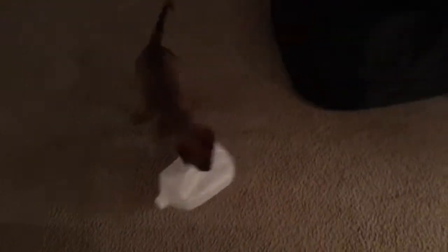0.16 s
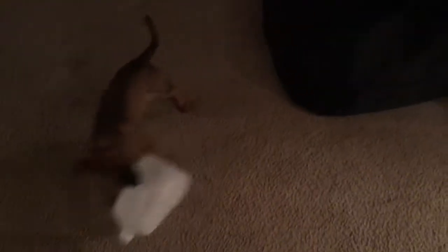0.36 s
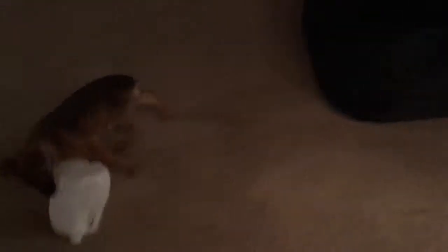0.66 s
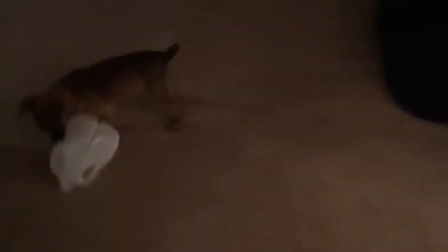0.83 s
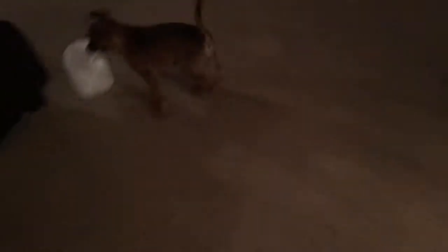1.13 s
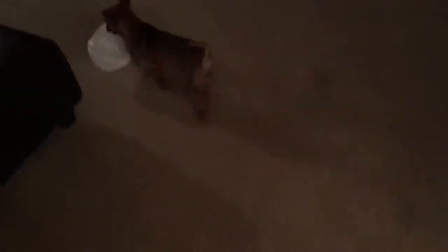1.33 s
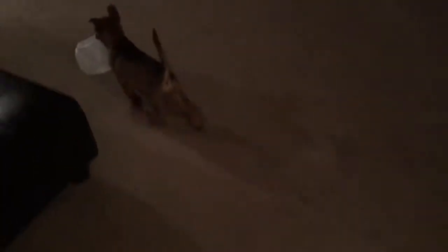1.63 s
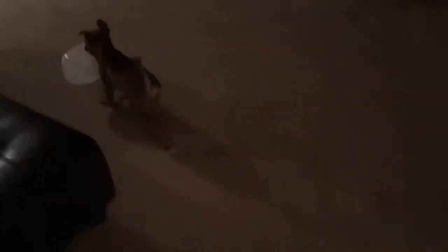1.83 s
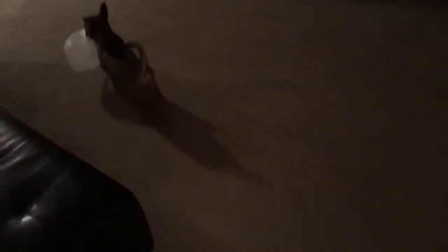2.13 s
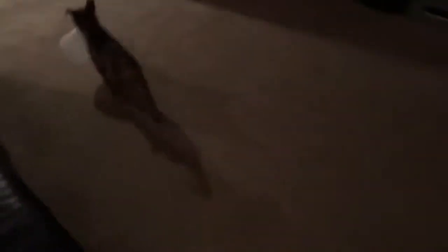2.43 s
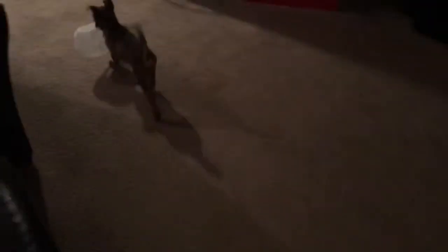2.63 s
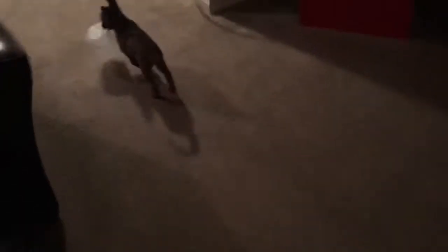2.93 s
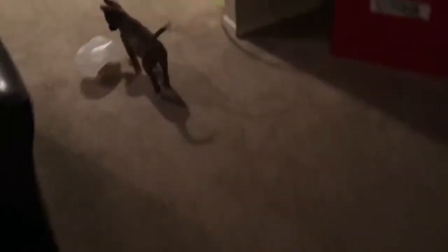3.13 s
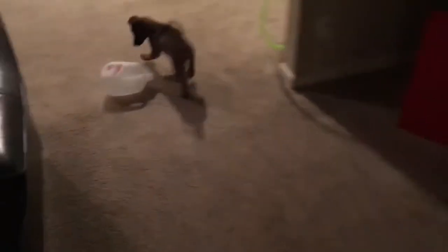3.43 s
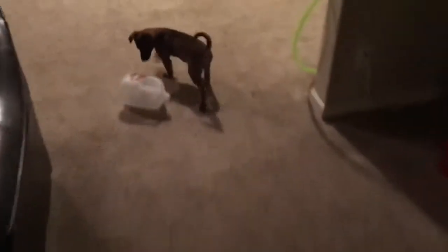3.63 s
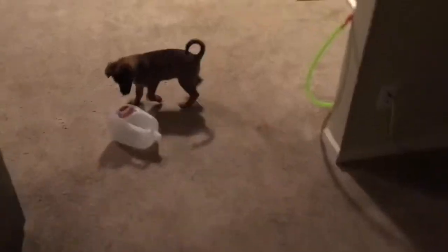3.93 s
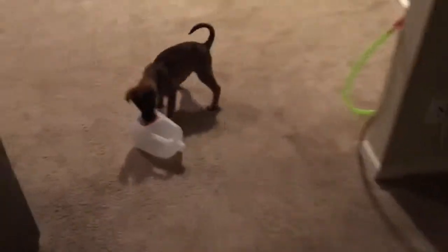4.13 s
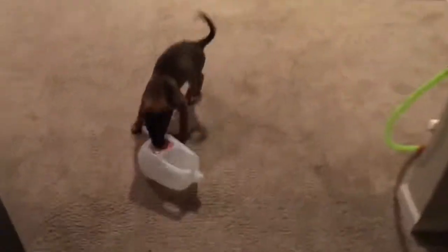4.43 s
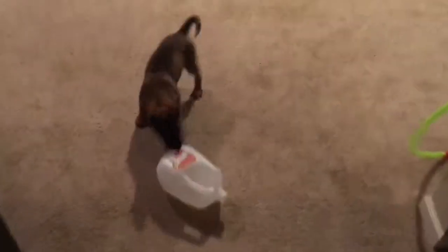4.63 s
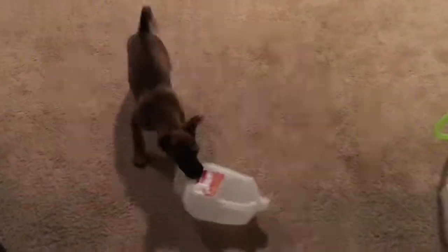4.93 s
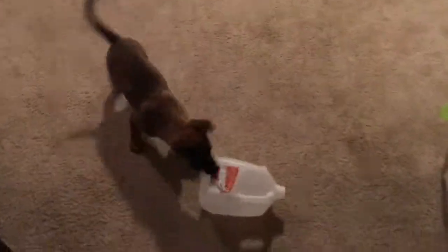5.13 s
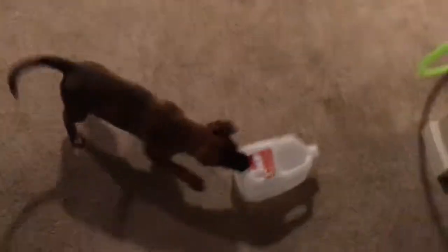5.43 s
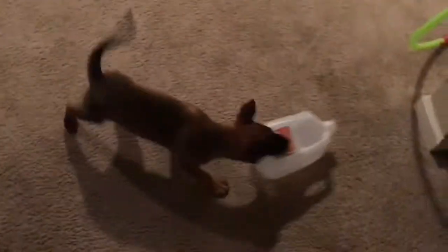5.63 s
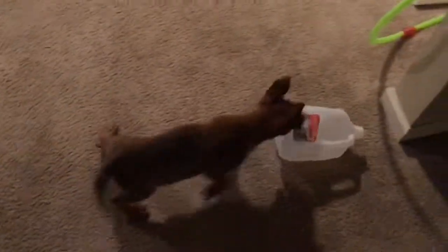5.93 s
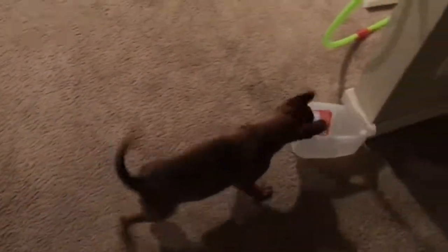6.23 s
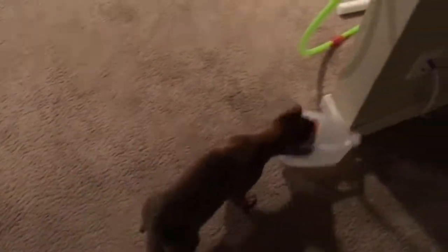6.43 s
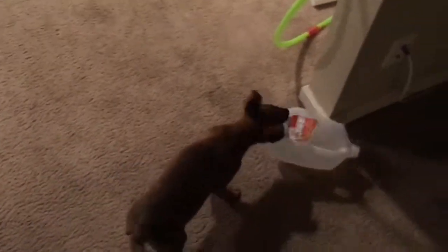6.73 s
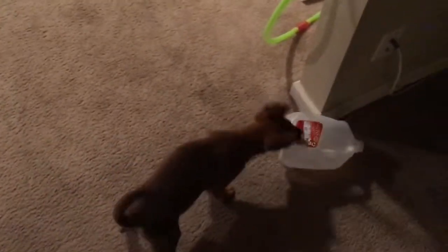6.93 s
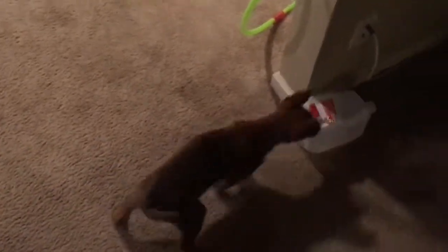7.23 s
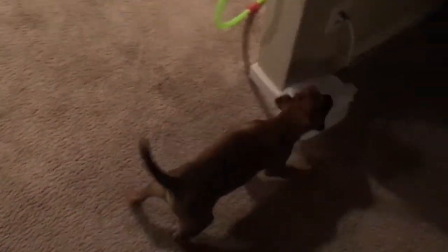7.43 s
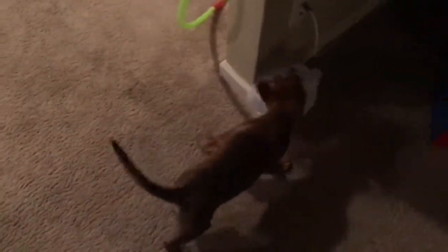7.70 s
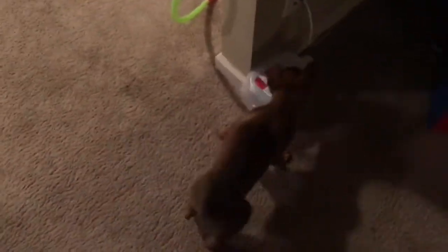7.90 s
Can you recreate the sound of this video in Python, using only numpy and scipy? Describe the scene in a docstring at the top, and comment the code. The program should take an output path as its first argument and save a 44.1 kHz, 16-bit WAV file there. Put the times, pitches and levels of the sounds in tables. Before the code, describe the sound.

A quiet, small carpeted room with soft air noise and a faint low hum that grows slightly after 3 s. From 0 to 1.3 s an empty plastic jug drags, rustles and taps softly in a puppy's mouth. Isolated hollow bonks follow at 1.8 and 2.6 s, with a looser double knock at 3.0-3.1 s as it drops, all somewhat distant and roomy. Almost nothing until 4.2 s, when a near, boomy knock and drumming scrape begin. From 4.4 to 5.8 s bites and shoves thicken into quick clacks, crinkles, rasping tooth skids and popping dents. At 6.05 s blows harden; at 6.2 s comes the loudest, a sharp crack with hollow boom and low wall thud. Another boomy knock at 6.5 s, scraping, then clusters at 7.1, 7.45, 7.6 and 7.85 s, with a faint high hissing rub near 7.6-7.9 s.

```python
"""An empty plastic jug booms and clacks as a puppy carries it over a carpet, drops it, then bites and
shoves it against a wall corner. Blows excite decaying modes of the thin walls; dents pop and ring.
Between blows, stick-slip impulses of teeth and carpet pile drum the panels, rasp and hiss.
The wall, the floor and the air in the jug add low modes. Decaying noise makes the small furnished room;
two sines and shaped noise make a faint appliance hum and still air."""
import sys
import numpy as np
from scipy import signal
from scipy.fft import rfft, irfft, next_fast_len
from scipy.io import wavfile
from scipy.ndimage import uniform_filter1d, map_coordinates

SR = 44100
rng = np.random.default_rng(int(sys.argv[2]) if len(sys.argv) > 2 else 0)


def put_to_file(sound):
    """Save the sound as 16-bit audio at rate SR, in the file named by the first command-line argument."""
    columns = np.atleast_2d(sound).T  # one column per channel
    safe = np.clip(columns, -1, 1)
    whole_steps = np.round(safe * 32767)
    wavfile.write(sys.argv[1], SR, whole_steps.astype(np.int16))


N = 355442
TIME = np.arange(N) / SR

# modes of the jug, air and whole panels first, then the stiff corners: mode_hz, relative_db, t60_s
JUG_MODES = [(154, -12, 0.15), (177.3, -10.5, 0.2), (224, 4, 0.062), (275.4, -8, 0.14), (308.3, 7, 0.11),
             (368.8, 7.5, 0.075), (422.5, -5.5, 0.067), (488.8, -8, 0.18), (563, -7, 0.039),
             (674, -21, 0.026), (918, 5, 0.068), (1010, 6.5, 0.068), (1174, 7.5, 0.05), (1340, 6, 0.057),
             (1463, 3.5, 0.12), (1629, 5, 0.1), (1980, 1.5, 0.045), (2240, 4, 0.032), (2460, -14, 0.035),
             (3260, 3.5, 0.034), (3780, -1.5, 0.025), (4090, 0, 0.072), (5500, 3.5, 0.021)]
PANEL_TOP_HZ = 760  # modes below belong to air and panels, modes above to the corners
# spectrum of the crackling corners: frequency_hz, relative_db
CLACK_SPECTRUM = [(250, -1.5), (550, 7), (900, -5.5), (1500, -6.5), (2300, -6), (2900, -10.5), (3600, -6.5),
                  (5000, -28.5), (8000, -72)]
# spectrum of the ticking skin and of the hissing pile: frequency_hz, relative_db
TICK_SPECTRUM = [(1500, 5), (3500, 0), (5500, -1.5), (7500, -3.5), (10500, -8.5), (15500, -15)]
# share of room in a blow, highest while the puppy is far away: time_s, room_db
ROOM_SHARE = [(0.5, -4), (1.8, -2), (3.1, -4), (4.5, -8), (8, -9.5)]


def amp(db):
    """Level to amplitude: 20 dB is a factor of ten."""
    return 10 ** (np.asarray(db) / 20)


def unit(x):
    """Normalise the mean power: scale to rms 1."""
    return x / np.sqrt(np.mean(x ** 2) + 1e-20)


def unit_attack(x):
    """Normalise the peak short-time power: the loudest hundredth of a second gets rms 1."""
    return x / np.sqrt(uniform_filter1d(x ** 2, SR // 100).max() + 1e-20)


def along(points, hz):
    """Interpolate (Hz, value) points on a logarithmic frequency axis."""
    f, v = np.transpose(points)
    return np.interp(np.log(hz + 1), np.log(f + 1), v)


def wobble(rate):
    """Slow random modulation: a smooth curve through random knots, rate knots per second."""
    return map_coordinates(rng.standard_normal(int(N * rate / SR) + 4), [TIME * rate])


def filtered(x, response):
    """Linear filtering: multiply the spectrum of x by a response of frequency."""
    m = next_fast_len(len(x) + SR // 4)
    return irfft(rfft(x, m) * response(np.fft.rfftfreq(m, 1 / SR)), m)[:len(x)]


def coloured(x, spectrum):
    """Spectral shaping: lay a spectrum on x and scale to rms 1."""
    return unit(filtered(x, lambda hz: amp(along(spectrum, hz))))


def add(track, s, sound):
    """Superposition: mix a sound into the track at s seconds."""
    part = track[max(round(s * SR), 0):][:len(sound)]
    part += sound[:len(part)]


def room(x, wet_db):
    """Reverberation: add x convolved with fresh noise that decays at its own rate in each band."""
    # decay time of the furnished room: frequency_hz, t60_s
    room_decay = [(100, 0.58), (290, 0.46), (560, 0.2), (800, 0.3), (1840, 0.23), (4850, 0.19),
                  (14000, 0.18)]
    hz, t, z = signal.stft(rng.standard_normal(SR // 2), SR, nperseg=256)
    tail = signal.istft(z * amp(-60 * t / along(room_decay, hz)[:, None]), SR, nperseg=256)[1]
    tail = np.pad(tail / np.linalg.norm(tail), (SR // 200, 0))  # the answer starts 5 ms late
    return x + amp(wet_db) * signal.fftconvolve(x, tail)[:len(x)]


def blow(pitch_hz, clack_hz, crush, boom_db, clack_db, tick_db):
    """Modal impact: a panel flexes and booms, the corners clack, the skin ticks."""
    # spectrum of the slap on the panel: frequency_hz, relative_db
    slap_spectrum = [(35, -28), (70, 5), (150, 21), (350, 21.5), (560, 0), (800, -24), (1150, -9),
                     (2000, -20), (4000, -66)]
    t = np.arange(SR // 3) / SR
    hz, db, t60 = np.transpose(JUG_MODES)
    hz = hz * (1 + 0.019 * rng.standard_normal(len(hz)))  # the grip bends the walls
    size = amp(db + 2 * rng.standard_normal(len(hz)))
    modes = size[:, None] * np.sin(2 * np.pi * hz[:, None] * t) * amp(-60 * t / t60[:, None])
    low = hz < PANEL_TOP_HZ

    def near(f, centre_hz, slope_db):
        """Local excitation: the struck spot feeds its own modes most; slope in dB per octave."""
        return amp(-slope_db * np.abs(np.log2((f + 1) / centre_hz)))

    def burst(spectrum, decay):
        """Broadband transient: shaped noise that falls 60 dB in decay seconds."""
        return coloured(rng.standard_normal(len(t)), spectrum) * amp(-60 * t / decay)

    crush = np.clip(crush, .0004, .02)  # s
    give = 1 - np.exp(-t / crush)  # a soft contact starts slowly and crackles longer

    panel = np.sin(2 * np.pi * pitch_hz * t) * amp(-60 * t / 0.066)
    panel_modes = (near(hz, pitch_hz, slope_db=3.5) * low) @ modes
    flex = unit_attack(panel_modes) + 1.13 * unit_attack(panel)
    slap = unit_attack(burst(slap_spectrum, decay=0.061))
    boom = (flex * (1 - np.exp(-t / 0.0029)) + 0.28 * slap) * give

    buckling = (rng.standard_normal(len(t)) * give * np.exp(-t / crush))[:SR // 10]
    # a small patch snaps in and is damped at once
    dent = np.sin(2 * np.pi * clack_hz * t) * amp(-60 * t / .012)
    corner_modes = (near(hz, clack_hz, slope_db=11.0) * ~low) @ modes
    ring = unit_attack(corner_modes) + 1.02 * unit_attack(dent)
    crackle = burst(CLACK_SPECTRUM, decay=0.044 + 9 * crush)
    crackle = filtered(crackle, lambda f: near(f, clack_hz, slope_db=3.0)) * give
    buckled_ring = signal.fftconvolve(ring, buckling)[:len(t)]
    clack = unit_attack(buckled_ring) + 0.7 * unit_attack(crackle)

    tick = burst(TICK_SPECTRUM, decay=0.034 + 8 * crush) * give
    # a hard tooth opens with a snap
    tick = tick + 2 * burst(TICK_SPECTRUM, decay=0.0067) * np.exp(-crush / 0.0019)

    levels = amp([boom_db, clack_db, tick_db])
    return levels @ [unit_attack(part) for part in (boom, clack, tick)]


def knocks():
    """Impact series: every blow is a separate modal impact with its own reverberation."""
    # blows on the jug, with the pitches of the struck panel and of the clack; blow() limits crush_s:
    # start_s, pitch_hz, clack_hz, crush_s, boom_db, clack_db, tick_db
    blows = [(0.442, 425, 664, 0.011, -39.5, -49, -57.5), (0.634, 446, 1600, 0.0004, -43.5, -50, -61),
             (0.982, 357, 980, 0.0027, -54, -51, -65), (1.008, 255, 1700, 0.004, -54, -57, -77),
             (1.3, 338, 900, .004, -58, -70, -80), (1.803, 295, 1060, 0.00041, -27.5, -57, -77),
             (1.824, 438, 810, 0.001, -37, -62, -76), (2.177, 293, 960, 0.0012, -48, -53.5, -63.5),
             (2.57, 225, 912, 0.0063, -49.5, -57.5, -67), (2.624, 246, 1300, 0.0012, -27, -57, -64),
             (2.655, 295, 900, 0.003, -42.5, -70, -79), (3.033, 250, 2150, 0.0019, -38, -51, -57),
             (3.039, 270, 970, 0.002, -39, -42, -69), (3.046, 403, 1550, 0.002, -48, -49, -65),
             (3.118, 307, 700, 0.002, -35.5, -60, -73), (3.146, 306, 700, 0.0023, -38, -65, -78),
             (3.48, 300, 1000, .003, -61, -66, -76), (3.75, 330, 1300, .003, -61, -67, -77),
             (4.201, 252, 2200, 0.001, -39.5, -62, -55), (4.227, 245.6, 2100, 0.00095, -27.5, -47.5, -45.5),
             (4.487, 386, 805, 0.0019, -30.5, -55, -73), (4.597, 336, 1500, 0.0012, -48, -45, -54),
             (4.619, 340, 2530, 0.00091, -36, -39.5, -51), (4.628, 335, 1300, 0.00082, -41, -42, -47),
             (4.655, 351, 1210, 0.0021, -42, -50, -52), (4.824, 299, 1470, 0.00023, -34, -48, -46.5),
             (4.845, 294, 1530, 0.00023, -40, -34, -39.5), (4.859, 322, 1200, .0007, -39, -52, -72),
             (4.935, 292, 1340, 0.011, -38.5, -43, -46), (4.975, 323, 1190, 0.0062, -39, -43.5, -63),
             (5.107, 360, 1250, 0.0011, -31, -42.5, -54), (5.118, 332, 1580, 0.0028, -38, -40.5, -49),
             (5.138, 327, 2730, 0.0017, -41, -41.5, -53), (5.26, 374, 2220, 0.0032, -58, -34, -38.5),
             (5.271, 348, 2290, 0.00066, -27.5, -35, -49), (5.289, 332, 1670, 0.0012, -24.5, -41, -44),
             (5.328, 298, 1200, .0006, -39, -57, -62), (5.385, 296, 2190, 0.0023, -34, -41, -58),
             (5.411, 378, 850, 0.0011, -38.5, -37, -43), (5.436, 322, 1400, 0.0025, -40, -42, -49),
             (5.526, 313, 980, 0.0006, -39, -41, -52), (5.536, 298, 1210, 0.0017, -29.5, -33.5, -42.5),
             (5.557, 290, 1720, 0.0019, -39, -38, -53), (5.672, 259, 1580, 0.0016, -27.5, -37, -41),
             (5.686, 299, 1680, 0.0003, -24, -29.5, -48), (5.692, 270, 900, 0.00077, -26, -40, -52),
             (5.78, 330, 1190, 0.0003, -49, -29.5, -42), (5.794, 360, 3220, 0.0004, -41, -34.5, -34.5),
             (6.047, 304, 980, 0.00035, -27.5, -27, -36.5), (6.085, 285, 1020, 0.0003, -20.5, -30.5, -47),
             (6.18, 393, 1140, 0.0013, -55, -37, -32), (6.191, 270, 1430, 0.00076, -17, -18, -27.5),
             (6.195, 394, 2030, 0.00076, -21, -21, -36), (6.2, 202, 2060, 0.0005, -19.5, -23.5, -27),
             (6.219, 403, 1252, 0.00053, -28, -36, -50), (6.315, 282, 1180, 0.0011, -32, -39, -62),
             (6.342, 297, 1200, 0.0012, -24.5, -54, -62), (6.491, 360, 1010, 0.0017, -48, -41, -67),
             (6.515, 335, 1590, 0.00059, -16, -34, -39.5), (6.521, 400, 803, 0.0019, -27.5, -34.5, -45),
             (6.692, 316, 2250, 0.0051, -31, -35.5, -45), (6.748, 293, 1430, 0.0035, -34, -57, -64),
             (6.812, 299, 1140, 0.001, -33, -39, -45), (6.955, 170, 900, 0.0057, -35, -80, -85),
             (6.977, 306, 900, 0.016, -36, -80, -85), (7.045, 171, 3370, 0.00034, -68, -55, -62),
             (7.074, 326, 2440, 0.0011, -23.5, -27.5, -35.5), (7.09, 239, 1180, 0.00037, -28, -33, -45),
             (7.108, 318, 2400, 0.00093, -33, -42, -71), (7.167, 482, 1510, 0.00052, -31, -28, -31),
             (7.175, 400, 1500, 0.00022, -41, -29.5, -32.5),
             (7.185, 200, 1120, 0.0013, -27.5, -25.5, -37.5), (7.228, 295, 1210, 0.0035, -28, -44, -59),
             (7.434, 310, 4120, 0.001, -48, -53, -49), (7.459, 376, 3000, 0.00032, -35.5, -38.5, -42.5),
             (7.472, 340, 1290, 0.0013, -28, -38, -48), (7.521, 346, 2100, 0.0019, -36.5, -43.5, -49),
             (7.596, 400, 686, 0.0076, -29.5, -32.5, -51), (7.606, 287, 1600, 0.0024, -34.5, -35.5, -51),
             (7.777, 386, 1750, 0.00075, -32.5, -36.5, -42.5),
             (7.831, 245, 1900, 0.0006, -33, -30.5, -38.5), (7.839, 387, 1230, 0.0029, -30, -29, -40),
             (7.854, 336, 1910, 0.0031, -34, -37.5, -50), (7.866, 260, 900, 0.0017, -32, -39, -59),
             (7.912, 326, 2400, .002, -33, -47, -64)]
    track = np.zeros(N)
    for s, *contact in blows:
        sound = np.pad(blow(*contact), (0, SR // 5))  # space for the room's answer
        add(track, s, room(sound, wet_db=np.interp(s, *np.transpose(ROOM_SHARE))))
    return track


def pops():
    """Snap-through buckling: a dented wall pops, chatters for a moment and rings out at one pitch."""
    # start_s, pitch_hz, level_db
    pop_events = [(1.803, 655, -49), (1.803, 1040, -55), (1.804, 1890, -69), (1.823, 813, -56),
                  (2.626, 966, -53), (2.626, 2030, -68), (3.04, 980, -49), (3.04, 2400, -58),
                  (5.108, 684, -42.5), (5.262, 2260, -40), (5.291, 670, -45), (5.527, 1660, -39),
                  (5.53, 1160, -40), (5.673, 1635, -43), (5.796, 1124, -35.5), (6.197, 1170, -26),
                  (6.198, 3700, -36.5), (6.517, 1580, -36), (6.698, 1065, -38), (7.075, 2514, -38.5),
                  (7.597, 1435, -33), (7.608, 1610, -40.5), (7.843, 2050, -40)]
    ring_t60_s, chatter_s = 0.053, 0.0069  # ring of the wall; time constant of its chatter
    track, t = np.zeros(N), np.arange(SR // 2) / SR
    for s, hz, db in pop_events:
        chatter = rng.standard_normal(len(t)) * np.exp(-t / chatter_s)
        ring = np.sin(2 * np.pi * hz * t) * amp(-60 * t / ring_t60_s) * (1 - np.exp(-t / 0.00074))
        rattle = signal.fftconvolve(ring, chatter)[:len(t)]
        sound = unit_attack(ring) + 0.98 * unit_attack(rattle)
        wet_db = np.interp(s, *np.transpose(ROOM_SHARE))
        add(track, s, amp(db) * room(unit_attack(sound), wet_db))
    return track


def thuds(hits, modes, attack_s, wet_db):
    """Modal response of a large body: a blow sets off its own modes, which build up slowly."""
    track, t = np.zeros(N), np.arange(SR // 2) / SR
    for s, db in hits:
        thud = np.zeros(len(t))
        for hz, level, t60 in modes:
            thud += amp(level - 60 * t / t60) * np.sin(2 * np.pi * (hz * t + rng.random()))
        thud = unit_attack(thud * (1 - np.exp(-t / attack_s)))
        add(track, s, amp(db) * room(thud, wet_db))
    return track


def bodies():
    """Coupled resonators: the air in the jug rings hollow, the wall panel thuds, the floor thumps."""
    # the hardest blows set the air inside the jug ringing: start_s, level_db
    hollow_hits = [(1.803, -38), (1.824, -41.5), (5.11, -41), (5.272, -44), (5.69, -37), (6.085, -31.5),
                   (6.194, -19.5), (6.516, -35.5), (7.075, -30.5), (7.186, -34), (7.6, -36), (7.84, -36)]
    # modes of that air, which keep their pitch however the walls bend: mode_hz, relative_db, t60_s
    cavity_modes = [(402.5, 3, .15), (480.6, -2, 0.25), (667.5, -5, .13), (856, -24, 0.18),
                    (1190, -23, 0.17), (1375, -27, .28)]
    # shoves that reach the hollow wall: start_s, level_db
    wall_bumps = [(6.193, -26), (6.52, -53), (7.075, -31), (7.189, -39), (7.837, -30.5)]
    # modes of the wall panel: mode_hz, relative_db, t60_s
    wall_modes = [(54, -2.5, 0.79), (76, -31, 0.33), (111, 1, 0.32), (130.4, 18, 0.19), (171.2, 11.5, 0.29)]
    # paws and jug land on the carpeted floor: start_s, level_db
    floor_landings = [(0.385, -52), (0.63, -50), (1.804, -46.5), (2.626, -38), (2.655, -42), (3.036, -40.5),
                      (3.116, -42), (7.78, -39)]
    # modes of the floor: mode_hz, relative_db, t60_s
    floor_modes = [(79, -1.5, 0.33), (104, -4, 0.091), (133, 3, 0.11), (159.6, -2.5, 0.18), (193, -0.5, .2)]
    cavity = thuds(hollow_hits, cavity_modes, attack_s=0.0033, wet_db=-12)
    wall = thuds(wall_bumps, wall_modes, attack_s=0.023, wet_db=-12.0)
    floor = thuds(floor_landings, floor_modes, attack_s=0.0068, wet_db=-12)
    return cavity + wall + floor


def slips(rate, spread_db):
    """Stick-slip friction: tiny impulses at random times, rate per second, of very uneven size."""
    happens = rng.random(N) < rate / SR
    return unit(happens * rng.standard_normal(N) * amp(spread_db * rng.standard_normal(N)))


def swell(s, rise, hold, release_db_per_s):
    """Stroke envelope: the gain rises linearly, holds and decays exponentially."""
    t = np.maximum(TIME - s, 0)
    return np.minimum(t / max(rise, 1e-4), 1) * amp(-release_db_per_s * np.clip(t - rise - hold, 0, 1))


def scrape_gains():
    """Masking by the strongest stroke: grabs start fast, drags swell, and the larger gain leads."""
    # the jaws seize the jug and the teeth skid on it; levels before scraping() trims each layer:
    # start_s, hold_s, drum_db, rasp_db, hiss_db
    grabs = [(0.6, 0.013, -50, -67, -57), (4.193, 0.33, -47.5, -56.5, -65), (4.823, 0.2, -39, -48, -53),
             (5.106, 0.03, -58, -44.5, -56), (5.256, 0.18, -37.5, -44.5, -51), (5.5, 0.14, -41, -54, -62),
             (5.677, 0.11, -37, -42, -51), (6.053, 0.19, -41, -39.5, -50), (6.2, 0.055, -37, -33, -56),
             (6.488, 0.033, -36.5, -39, -57), (7.07, 0.12, -34.5, -39.5, -53),
             (7.147, 0.047, -38, -37.5, -46), (7.431, 0.072, -43, -54, -54), (7.571, 0.24, -45, -46.5, -62),
             (7.783, 0.068, -31.5, -38.5, -57)]
    # the jug drags over carpet or brushes the trotting puppy's coat; levels before the same trims:
    # start_s, rise_s, hold_s, drum_db, rasp_db, hiss_db
    drags = [(0.0, 0.0012, 0.006, -50.5, -56, -86), (0.03, .03, 0.23, -63, -61, -76.5),
             (0.18, 0.016, 0.0086, -65, -72, -64), (0.285, 0.013, 0.097, -49.5, -60, -85),
             (0.38, 0.036, 0.061, -44, -48, -65), (0.73, 0.0096, 0.065, -50.5, -69, -57.5),
             (0.965, 0.0074, 0.021, -47.5, -58, -90), (1.285, 0.01, 0.021, -52.5, -69, -88),
             (1.49, 0.014, 0.051, -60, -60, -68.5), (2.2, 0.1, 0.31, -66.5, -67, -78),
             (2.44, 0.013, 0.023, -56, -70, -80.5), (2.9, 0.036, 0.16, -56.5, -66, -73),
             (3.11, 0.0024, 0.0078, -41, -72, -58.5), (3.24, 0.011, 0.23, -80, -70, -75.5),
             (3.47, 0.011, .02, -75, -71, -77), (3.55, 0.018, 0.38, -89, -82, -83.5),
             (3.74, .012, .02, -66, -64, -80), (3.94, 0.01, 0.018, -77, -68, -73),
             (4.44, 0.021, 0.18, -39.5, -43, -54.5), (5.77, 0.0033, 0.016, -48, -36, -44.5),
             (6.24, 0.015, 0.068, -39.5, -42, -56), (6.3, 0.027, 0.093, -48.5, -50, -68),
             (6.575, 0.0099, 0.1, -39.5, -38.5, -60), (6.66, 0.016, 0.14, -38, -43, -51),
             (7.92, 0.012, 0.04, -42.5, -50.5, -68)]
    # how fast each layer dies when a scrape ends, in dB per second: drumming, rasp, hiss
    release_rates = [166, 154, 151]
    grab_rise_s = .003
    strokes = [(s, grab_rise_s, *rest) for s, *rest in grabs] + list(drags)
    gains = np.zeros((3, N))
    for s, rise, hold, *levels_db in strokes:
        stroke = [amp(db) * swell(s, rise, hold, fall) for db, fall in zip(levels_db, release_rates)]
        gains = np.maximum(gains, stroke)
    return gains


def wandering_ring(drive, modes, wander_db):
    """Driven resonance: slips ring the modes, which swell and fade as the contact point travels."""
    size = next_fast_len(N)
    spectrum, f = rfft(drive, size), np.fft.rfftfreq(size, 1 / SR)
    ring = np.zeros(N)
    for hz, db, t60 in modes:
        width = 2 * np.log(1000) / (np.pi * t60)  # Hz; rubbing doubles the damping
        response = 1j * f * width / (hz * hz - f * f + 1j * f * width)
        mode = irfft(spectrum * response, size)[:N]
        ring += amp(db + wander_db * wobble(22)) * unit(mode)
    return unit(ring)


def gliding_ring(drive, hz, width_hz):
    """Time-varying resonance: a one-pole filter in a frame that turns at the moving pitch; rms 1."""
    turn = np.exp(2j * np.pi * np.cumsum(hz) / SR)
    pole = np.exp(-np.pi * width_hz / SR)
    return unit((turn * signal.lfilter([1], [1, -pole], drive / turn)).imag)


def creases():
    """Crackling: small creases in the plastic snap at random times, each a short decaying sine."""
    rate, size_spread_db = 170, 3  # creases per second, scatter of their size
    centre_hz, spread_oct, decay_cycles = 1700, .65, 8
    track, t = np.zeros(N), np.arange(SR // 25) / SR
    count = int(rate * N / SR)
    starts = rng.uniform(0, N / SR, count)
    scatter = np.clip(rng.standard_normal((count, 2)), -2, 2)
    for s, (pitch, size) in zip(starts, scatter):
        cycles = centre_hz * 2 ** (spread_oct * pitch) * t
        snap = np.sin(2 * np.pi * cycles) * np.exp(-cycles / decay_cycles)
        add(track, s, amp(size_spread_db * size) * snap)
    return unit(track)


def scraping():
    """Friction-driven vibration: coarse slips drum the panels, finer ones rasp, the pile hisses."""
    # spectrum of the drumming: frequency_hz, relative_db
    drum_spectrum = [(50, -29), (110, -22), (180, 3.5), (290, -0.5), (400, 5), (520, -1.5), (750, -6),
                     (1400, -46)]
    # pitch of the panel that scrapes, set by the grip and the side the jug lies on; it wanders around
    # these values: time_s, pitch_hz
    drum_pitch = [(0.65, 452), (1.0, 343), (3.1, 299), (4.5, 342), (5.05, 350), (5.35, 305), (6.8, 325),
                  (7.5, 329)]
    rasp_top_hz = 4770  # above this the corners no longer ring and only the pile hisses
    drum_gain, rasp_gain, hiss_gain = scrape_gains()
    pressure = amp(2.3 * wobble(45))
    panels = [mode for mode in JUG_MODES if mode[0] < PANEL_TOP_HZ]
    corners = [mode for mode in JUG_MODES if mode[0] >= PANEL_TOP_HZ]

    catches = slips(rate=500, spread_db=1)
    crinkles = slips(rate=750, spread_db=2.5) * amp(2.7 * wobble(170))  # the crinkles come in clumps
    pile = slips(rate=9000, spread_db=2)

    # the panel under the jaws changes pitch as it bends
    bent_hz = np.interp(TIME, *np.transpose(drum_pitch)) * 2 ** (0.15 * wobble(18))
    bending = gliding_ring(catches, bent_hz, width_hz=36)
    drumming = wandering_ring(catches, panels, wander_db=0.5) + 0.84 * bending
    hollow = coloured(drumming, drum_spectrum) + .5 * coloured(catches, drum_spectrum)
    grit = wandering_ring(crinkles, corners, wander_db=5)
    grit = grit + .65 * coloured(crinkles, CLACK_SPECTRUM) + .85 * creases()
    grit = filtered(grit, lambda hz: 1 / (1 + (hz / rasp_top_hz) ** 6) ** .5)

    drum = amp(-2.5) * drum_gain * unit(hollow)
    rasp = amp(-6.0) * rasp_gain * unit(grit)
    hiss = amp(1.5) * hiss_gain * coloured(pile, TICK_SPECTRUM)
    return room(pressure * (drum + rasp + hiss), wet_db=-5.0)


def skids():
    """Stick-slip resonance: a skidding tooth rings a small patch, whose pitch glides as it travels."""
    # start_s, length_s, first_hz, last_hz, level_db
    skid_events = [(0.28, 0.19, 2040, 2100, -66), (0.415, 0.11, 3700, 4050, -66),
                   (0.428, 0.062, 760, 596, -50.5), (0.417, 0.086, 2150, 2300, -64),
                   (0.597, 0.018, 3200, 3600, -66), (0.722, 0.15, 1660, 1790, -61.5),
                   (0.732, 0.11, 3580, 3400, -65), (4.442, 0.041, 790, 900, -48),
                   (4.454, 0.16, 3140, 3730, -57), (4.52, 0.087, 1100, 1650, -57),
                   (4.596, 0.056, 1760, 1390, -52), (4.925, 0.086, 1530, 1270, -49),
                   (5.355, 0.063, 2200, 2300, -52), (5.401, 0.042, 1580, 1330, -45),
                   (5.788, 0.029, 1070, 1320, -44), (6.147, 0.022, 3300, 3700, -45),
                   (6.245, 0.094, 2040, 1800, -48), (6.573, 0.032, 2850, 3250, -49),
                   (6.579, 0.052, 1690, 2170, -44.5), (6.663, 0.0349, 3320, 3960, -51),
                   (6.686, 0.04, 1040, 1130, -42), (6.736, 0.078, 2170, 2530, -49.5),
                   (6.76, 0.042, 3450, 3740, -53), (7.432, 0.017, 3560, 3570, -47.5),
                   (7.894, 0.022, 2000, 2600, -54)]
    quality, edge_s = 9, .014  # pitch over width of the resonance; fade in and out
    track, slipping = np.zeros(N), slips(rate=1200, spread_db=3)
    for s, length, first_hz, last_hz, db in skid_events:
        t = np.arange(int((length + edge_s) * SR)) / SR
        drive = np.roll(slipping, -round(s * SR))[:len(t)]
        pitch_hz = np.interp(t, [0, length], [first_hz, last_hz])
        rasp = gliding_ring(drive, pitch_hz, first_hz / quality)
        fade = np.minimum(np.minimum(t, t[-1] - t) / edge_s, 1)
        add(track, s, amp(db) * rasp * fade)
    return room(track, wet_db=-8.5)


def wall_rub(centre_hz=6100, width_hz=1700):
    """Sliding friction: the jug's plastic edge on painted wall makes a narrow band of noise."""
    # the one slide: start_s, rise_s, hold_s
    wall_slide = (7.59, .17, .15)
    noise = rng.standard_normal(N)
    band = filtered(noise, lambda hz: 1 / (1 + ((hz - centre_hz) / width_hz * 2) ** 2))
    return amp(-54.5) * swell(*wall_slide, release_db_per_s=222) * unit(band * amp(wobble(40)))


def background():
    """Steady sources: phase-modulated sines make an unsteady hum, shaped noise the still air."""
    # appliance hum, levels before the approach gain: pitch_hz, level_db
    hum_tones = [(70, -57), (102.3, -76)]
    # spectrum of the room air: frequency_hz, relative_db
    air_spectrum = [(15, -42), (28, -19), (48, 7), (68, 2), (104, 4), (146, -8), (204, 1.5), (262, -11.5),
                    (410, -10.5), (500, -17.5), (1030, -18.5), (4940, -32), (6540, -32), (16000, -42.5)]
    hum = np.zeros(N)
    for hz, db in hum_tones:
        hum += amp(db) * np.sqrt(2) * np.sin(2 * np.pi * hz * TIME + .5 * wobble(27.0))
    # the hum grows from far to near: times in s, gains in dB
    approach = amp(np.interp(TIME, (3.2, 4.7), [-11, 3]))
    return approach * hum + amp(-57) * coloured(rng.standard_normal(N), air_spectrum)


def scene():
    """Superposition of the jug, the bodies it strikes and the background, in one channel."""
    jug = knocks() + pops() + bodies() + scraping() + skids()
    return (jug + wall_rub() + background())[None]


def record(dry):
    """Band limitation: nothing passes from 16 kHz upwards."""
    top_hz = 16000
    return np.array([filtered(channel, lambda hz: hz < top_hz) for channel in dry])


dry = scene()
out = record(dry)
put_to_file(out)
```